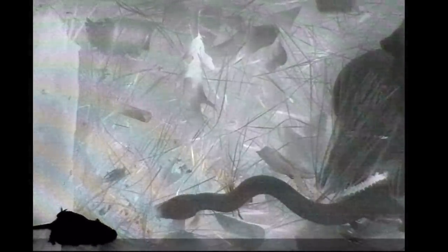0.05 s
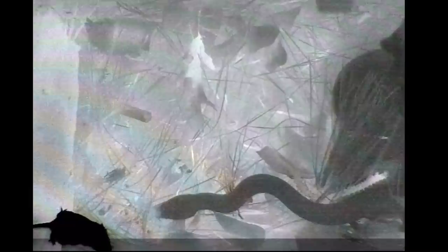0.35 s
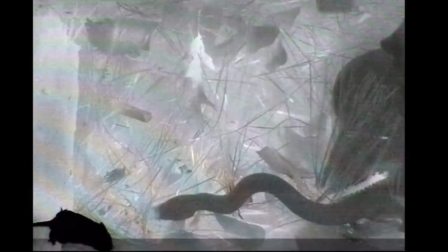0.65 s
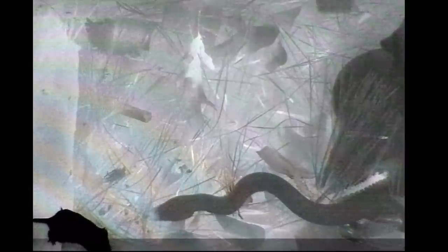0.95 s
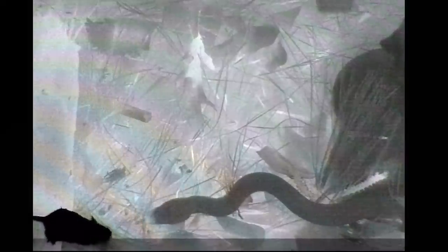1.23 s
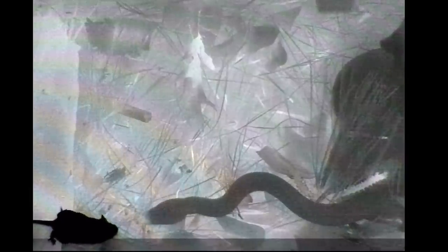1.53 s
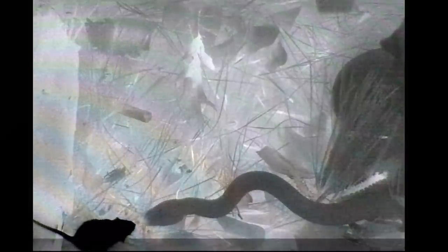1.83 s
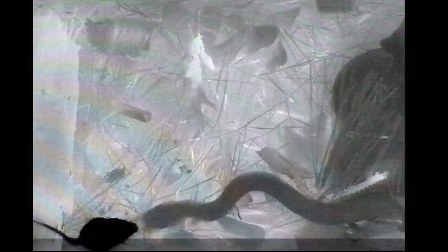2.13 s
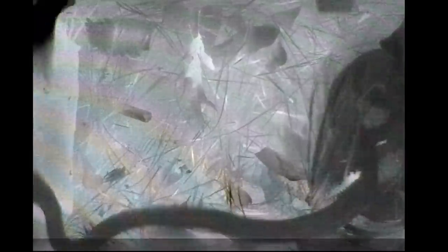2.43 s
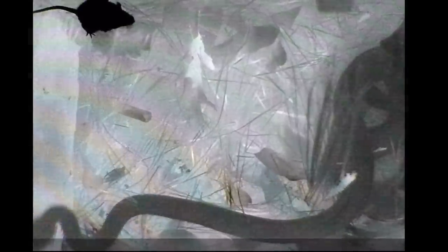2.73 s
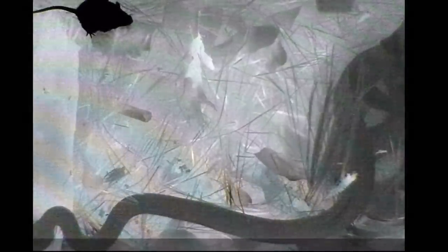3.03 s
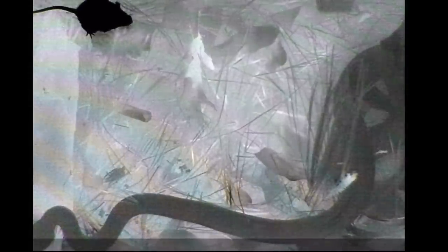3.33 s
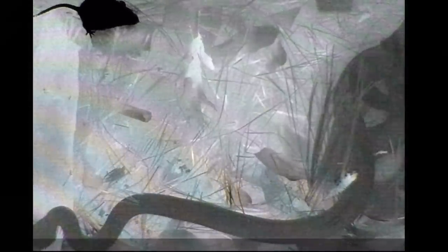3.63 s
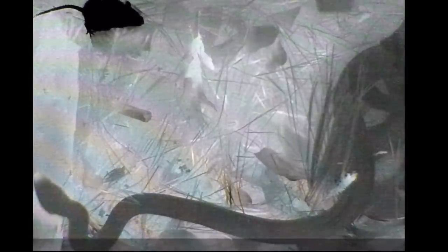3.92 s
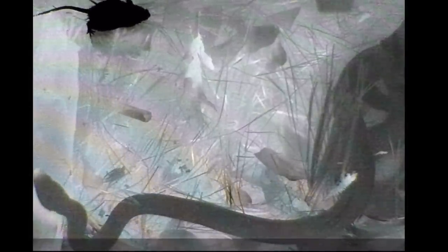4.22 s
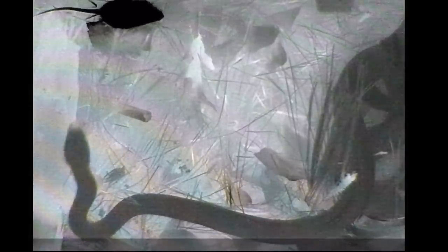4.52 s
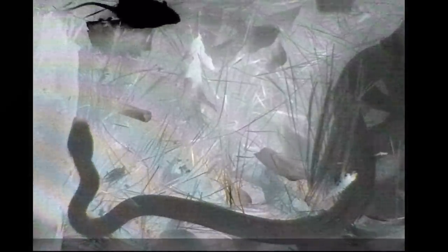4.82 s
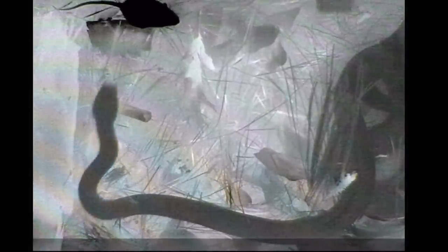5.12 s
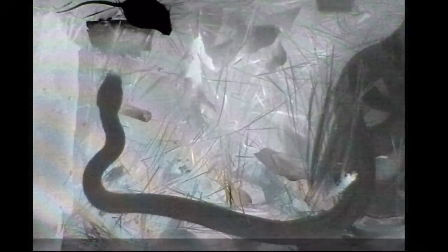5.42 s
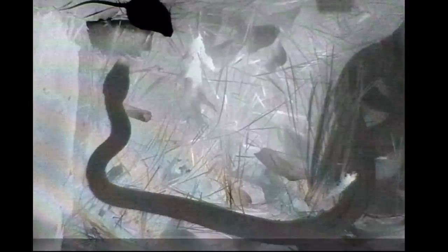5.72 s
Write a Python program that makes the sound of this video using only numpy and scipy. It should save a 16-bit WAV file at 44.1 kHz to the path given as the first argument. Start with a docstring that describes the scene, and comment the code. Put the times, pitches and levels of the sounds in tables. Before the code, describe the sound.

Faint mouse steps in an enclosure give way to a snake's sudden thumping lunge through dry leaves, followed by a few tiny ticks.

```python
"""Snake strikes at a mouse

In a thin-walled enclosure littered with dry grass and leaves, a mouse patters about and snaps a stalk.
The snake lunges, knocks the wall, thumps the floor and slides through the crackling litter.
A few faint ticks and a dull scrape follow, over a bed of low room rumble and microphone hiss."""
import sys
import numpy as np
from scipy import signal
from scipy.fft import rfft, irfft, next_fast_len
from scipy.io import wavfile
from scipy.ndimage import map_coordinates

SR = 44100
rng = np.random.default_rng(int(sys.argv[2]) if len(sys.argv) > 2 else 0)


def to_wav(sig):
    """Store sig (one row per channel, or 1-D mono) as 16-bit WAV at the path in sys.argv[1].

    Samples outside -1..1 are clipped; the rate is SR.
    """
    pcm = np.clip(np.atleast_2d(sig), -1, 1) * 32767
    pcm = np.round(pcm).astype(np.int16)
    wavfile.write(sys.argv[1], SR, pcm.T)  # frames by channels


N = 258426


def amp(db):
    """Decibels to gain."""
    return 10 ** (np.asarray(db) / 20)


def unit(x):
    """Scale to rms 1."""
    return x / np.sqrt(np.mean(x ** 2) + 1e-20)


def filtered(x, response):
    """Shape x with a gain curve over frequency."""
    size = next_fast_len(len(x) + SR // 2)
    return irfft(rfft(x, size) * response(np.fft.rfftfreq(size, 1 / SR)), size)[:len(x)]


def eq(x, points):
    """EQ through (f/Hz, level/dB) points joined on a log axis."""
    f, db = np.transpose(points)
    return filtered(x, lambda hz: amp(np.interp(np.log(hz + 1), np.log(f), db)))


def noise(points):
    """Coloured noise, rms 1."""
    return unit(eq(rng.standard_normal(N), points))


def wobble(rate):
    """A smooth random curve, rate knots a second."""
    knots = rng.standard_normal(int(N * rate / SR) + 4)
    return map_coordinates(knots, [np.arange(N) * rate / SR])


def grains(rate, spread_db):
    """Tiny random clicks of uneven size, about rate a second, rms 1."""
    hits = rng.random(N) < rate / SR
    sizes = amp(spread_db * np.clip(rng.standard_normal(N), -2, 2))
    return unit(hits * rng.choice([-1, 1], N) * sizes)


def add(track, s, sound):
    """Mix a sound into the track at s seconds."""
    part = track[round(s * SR):][:len(sound)]
    part += sound[:len(part)]


def envelope(start_s, length_s, attack_s, fade_db_per_s):
    """Gain of one movement: it swells from the start and fades once its length has passed."""
    t = np.arange(N) / SR - start_s
    return np.clip(t / attack_s, 0, 1) * amp(-fade_db_per_s * np.maximum(t - length_s, 0))


def floor_hum(centre_hz, width_hz):
    """The floor's main resonance, stirred at random, rms 1."""
    return unit(filtered(rng.standard_normal(N), lambda hz: 1 / (1 + ((hz - centre_hz) / width_hz) ** 4)))


# Low end of the room: f/Hz, level/dB
RUMBLE_EQ = [(20, -33), (30, -5), (42, 5.5), (62, -4), (82, -1), (125, -7.5), (160, -5.5), (200, -12.5),
             (310, -19.5), (500, -28.5), (1000, -56.5)]
# Soft midrange rush, for the air and the snake's creep: f/Hz, level/dB
RUSH_EQ = [(300, -31), (700, 1.5), (2500, 1), (4500, -7.5), (9000, -32)]
# Microphone hiss: f/Hz, level/dB
HISS_EQ = [(240, -29), (400, -2), (707, -1.5), (837, -4), (1100, -5), (1600, -8.5), (3190, -8.5),
           (4910, -12), (6000, -9), (7670, -13.5), (9220, -10), (10300, -8.5), (12000, -10), (15100, -9.5),
           (15800, -16.5)]

def room_tone():
    """The bed: low rumble, the floor's wavering hum, a fading breath of air and steady hiss."""
    rumble = amp(-66.5) * noise(RUMBLE_EQ)
    hum = amp(-72 + 2.5 * wobble(rate=4.3)) * floor_hum(centre_hz=155.6, width_hz=15.5)
    air = amp(-85 - 4.5 * np.arange(N) / SR) * noise(RUSH_EQ)
    return rumble + hum + air + amp(-76.5) * noise(HISS_EQ)


# Dark tone of the wall scrape: f/Hz, level/dB
SCRAPE_EQ = [(120, 7), (300, 0), (420, -7), (550, -0.5), (1500, -6), (3000, -11.5), (4500, -21),
             (12000, -30)]

def wall_scrape():
    """A dull, grainy drag along the wall starts sharply and tails off."""
    drag = amp(-63.5) * envelope(5.744, 0, attack_s=0.003, fade_db_per_s=31)
    return drag * unit(eq(grains(rate=3800, spread_db=3), SCRAPE_EQ))


# Modes of the enclosure's floor and walls: f/Hz, level/dB, t60/s
ENCLOSURE_MODES = [(51.4, -15, 0.082), (78, -12.5, 0.2), (108, -11.5, 0.25), (161.5, -6, 0.19),
                   (183.5, 6.5, 0.13), (200.2, -1, 0.14), (303, -14.5, 0.27), (477, -2.5, 0.059),
                   (517, -19, 0.11), (621, -14, 0.13), (769, -19.5, 0.23), (926, -9.5, 0.11),
                   (1053, -7.5, 0.074), (1088, -5, 0.06), (1720, -6.5, 0.014), (2200, -8.5, 0.017),
                   (3050, -19, 0.041)]

def enclosure_ring(bright_hz, rise_s):
    """The enclosure rings from one contact, peak 1: a soft body reaches only the low modes."""
    t = np.arange(SR // 3) / SR
    hz, db, t60 = np.transpose(ENCLOSURE_MODES)[:, :, None]
    force = (hz / bright_hz) / (1 + (hz / bright_hz) ** 4)
    modes = force * amp(db - 60 * t / t60) * np.sin(2 * np.pi * hz * t)
    ring = modes.sum(axis=0) * (1 - np.exp(-t / rise_s)) ** 2
    return ring / np.abs(ring).max()


def drumming(bright_hz, rise_s):
    """Many small soft contacts keep the floor ringing, rms 1."""
    contacts = grains(rate=300, spread_db=2)
    return unit(signal.fftconvolve(contacts, enclosure_ring(bright_hz, rise_s))[:N])


# The floor flexing under the mouse's steps: t/s, peak level/dB, length/s
STEP_CUES = [(0.808, -58.5, 0.072), (.92, -61.5, 0.075), (1.268, -48, 0.065), (1.324, -46, 0.076),
             (1.375, -51.5, 0.094), (1.455, -52.5, 0.066), (3.639, -57, 0.041)]

def mouse_feet():
    """Light feet patter on the floor; single soft steps swell and release its main resonance."""
    stroll = amp(-68.5) * envelope(0.8, 1.42, attack_s=0.032, fade_db_per_s=296)
    patter = floor_hum(centre_hz=154, width_hz=21.6) + amp(1) * drumming(bright_hz=100.5, rise_s=0.014)
    flex = np.zeros(N)
    for s, db, length in STEP_CUES:
        add(flex, s, amp(db) * np.hanning(int(length * SR)))
    floor_tone = np.sin(2 * np.pi * 164.2 * np.arange(N) / SR + 0.57 * wobble(rate=9.6))
    return stroll * patter + flex * floor_tone


# The mouse's scratches: t/s, length/s, level/dB
SCRATCH_CUES = [(0.817, .15, -83), (1.097, .07, -78.5), (1.833, 0.11, -75), (1.93, 0.064, -73.5)]
# Claws in the litter: f/Hz, level/dB
CLAW_EQ = [(300, -13), (500, -1.5), (750, -5.5), (1060, -1), (1300, -8.5), (2800, -9), (5000, -11.5),
           (15000, -18)]

def mouse_claws():
    """Claws rake the litter in fine grains; each scratch swells and dies away."""
    rustle = sum(amp(db) * envelope(s, length, attack_s=0.035, fade_db_per_s=130)
                 for s, length, db in SCRATCH_CUES)
    return rustle * unit(eq(grains(rate=6000, spread_db=4), CLAW_EQ))


# Crisp tone of dry grass and leaves, snapped or crushed: f/Hz, level/dB
LITTER_EQ = [(710, -54), (1200, -23), (1640, 7.5), (1770, -1.5), (2690, 2), (2940, 1), (3570, 0.5),
             (5860, -0.5), (7110, -5), (8270, -2.5), (10300, -1), (13000, -3), (15800, -7)]
# Dry stalks snapping: t/s, crack level/dB, stalk pitch f/Hz
SNAP_CUES = [(1.131, -61, 3860), (1.167, -63, 3640), (1.29, -60, 4370), (1.599, -62, 4040),
             (1.9683, -40.5, 8500), (2.234, -50, 9600), (2.3045, -41, 4930), (2.334, -44, 12730),
             (2.541, -39, 9200), (3.267, -64.5, 4300), (4.052, -65, 4270), (4.196, -68, 2820),
             (5.78, -56, 9900)]

def stalk_snaps():
    """A stalk cracks and rings and the litter around it crackles, all strongest near the stalk's pitch."""
    crack_t60_s, ring_t60_s, tail_t60_s = 0.004, 0.0066, 0.093
    out, t = np.zeros(N), np.arange(SR // 8) / SR
    crackle = eq(grains(rate=18000, spread_db=9), LITTER_EQ)
    crack_noise = noise(LITTER_EQ)
    for s, db, stalk_hz in SNAP_CUES:
        start = rng.integers(N - len(t))
        stalk_eq = [(stalk_hz / 2, -8), (stalk_hz, 0), (stalk_hz * 2, -5)]
        crack = eq(crack_noise[start:][:len(t)], stalk_eq) * amp(-60 * t / crack_t60_s)
        ring = amp(-13.5 - 60 * t / ring_t60_s) * np.sin(2 * np.pi * stalk_hz * t)
        tail_db = -46 + 0.44 * db  # the crackle grows more slowly than the snap
        tail_gain = amp(tail_db - 60 * t / tail_t60_s) * (1 - np.exp(-t / 0.00076))
        tail = tail_gain * unit(eq(crackle[start:][:len(t)], stalk_eq))
        add(out, s, amp(db) * (crack / np.abs(crack).max() + ring) + tail)
    return out


# Lunge, strike, recoil and settling: t/s, length/s, crackle level/dB, rub level/dB
STROKE_CUES = [(2.239, 0.017, -58, -66), (2.262, 0.027, -67, -65), (2.295, 0.021, -57.5, -57),
               (2.319, 0.018, -57.5, -55.5), (2.386, 0.081, -63.5, -59.5), (2.424, .11, -58, -63.5),
               (2.544, 0.026, -59.5, -54), (2.61, 0.048, -67, -66.5), (2.655, .04, -61, -67),
               (2.736, 0.049, -70.5, -71.5), (2.785, .022, -82, -68)]
# The belly rubbing the floor: f/Hz, level/dB
BELLY_EQ = [(250, -8), (500, 2), (950, 1), (1300, -4), (2800, -9), (5000, -14)]

def snake_slide():
    """Each stroke of the body crushes litter in clumps and rubs the floor; later it creeps on softly."""
    crackle, rub = np.zeros(N), np.zeros(N)
    for s, length, crackle_db, rub_db in STROKE_CUES:
        push = envelope(s, length, attack_s=0.012, fade_db_per_s=210)  # litter gives way, then settles
        crackle = np.maximum(crackle, amp(crackle_db) * push)
        rub = np.maximum(rub, amp(rub_db) * push)
    clumps = amp(0.75 * wobble(rate=120))
    stalks = unit(clumps * eq(grains(rate=6000, spread_db=2.5), LITTER_EQ))
    belly = unit(clumps * eq(grains(rate=3600, spread_db=0.5), BELLY_EQ))
    creep = amp(-83) * envelope(4.16, 0.7, attack_s=0.47, fade_db_per_s=10)
    return crackle * stalks + rub * belly + creep * noise(RUSH_EQ)


# Bright crunch of leaves under the landing body: f/Hz, level/dB
CRUNCH_EQ = [(3000, -22), (7000, -12), (10000, 0), (15500, -1)]

def snake_landing(land_s):
    """The landing bursts dry leaves and jolts the floor's low modes; writhing keeps the floor drumming."""
    crunch = amp(-54) * envelope(land_s, 0.012, attack_s=0.004, fade_db_per_s=450)
    crunch *= unit(eq(grains(rate=3000, spread_db=0), CRUNCH_EQ))
    jolt = amp(-38.5) * envelope(land_s, 0.039, attack_s=0.012, fade_db_per_s=343)
    jolt *= drumming(bright_hz=88, rise_s=0.0007)
    writhe = amp(-48) * envelope(land_s, 0.24, attack_s=0.012, fade_db_per_s=71)
    writhe *= drumming(bright_hz=108, rise_s=0.0012)
    return crunch + jolt + writhe


# Bodies hitting the enclosure: t/s, peak level/dB, brightness f/Hz
IMPACT_CUES = [(1.133, -66.5, 2000), (1.167, -64.5, 2000), (1.9674, -63.5, 2190), (2.304, -37, 2960),
               (2.3081, -33.5, 1100), (2.331, -41.5, 1490), (2.3376, -20, 320), (2.3537, -23.3, 190),
               (2.362, -45, 1380), (2.4113, -32, 172), (2.468, -40.5, 190), (2.52, -39, 170),
               (2.56, -45.5, 1080), (2.5673, -35.5, 300), (3.949, -64.5, 3000), (4.049, -69, 2400),
               (4.108, -63, 950), (5.749, -58.5, 1300)]

def impacts():
    """Footfalls, the knock of the strike and the snake's thump: harder contacts speak faster."""
    rise_cycles = 0.52
    out = np.zeros(N)
    for s, db, bright_hz in IMPACT_CUES:
        add(out, s, amp(db) * enclosure_ring(bright_hz, rise_cycles / bright_hz))
    return out


def scene():
    """All layers meet in mono at one close microphone."""
    action = impacts() + stalk_snaps() + snake_slide() + snake_landing(land_s=2.329)
    mouse = mouse_feet() + mouse_claws()
    return (action + mouse + wall_scrape() + room_tone())[None]


# Treble dips of the microphone port: f/Hz, level/dB
MIC_EQ = [(4200, -0.5), (4900, -2.5), (5700, -0.5), (9500, 0.5), (10400, -4.5), (11400, 1.5)]

def record(dry):
    """The microphone's colour, a steep bass cut and a hard top limit."""
    low_cut_hz, top_hz = 33, 15800
    band = lambda hz: (hz < top_hz) * hz ** 6 / (hz ** 6 + low_cut_hz ** 6)
    return filtered(eq(dry[0], MIC_EQ), band)[None]


dry = scene()
out = record(dry)
to_wav(out)
```